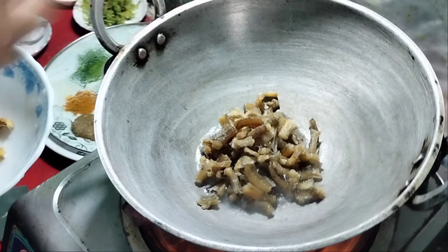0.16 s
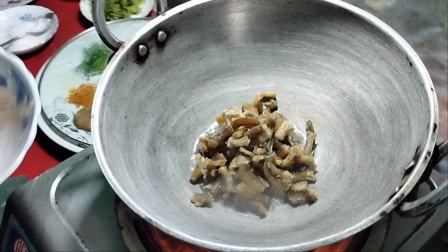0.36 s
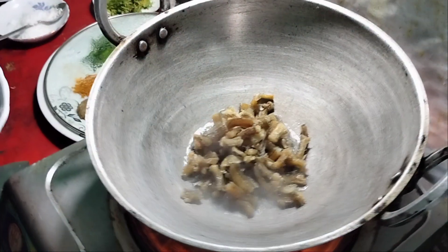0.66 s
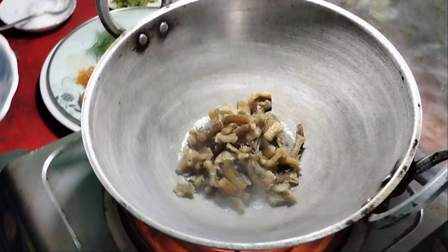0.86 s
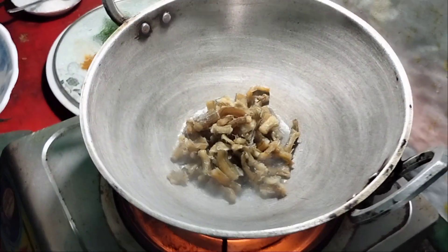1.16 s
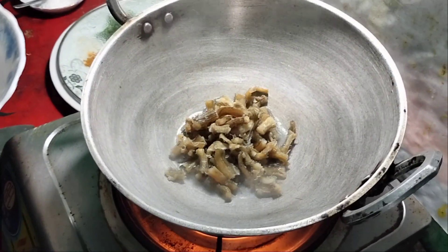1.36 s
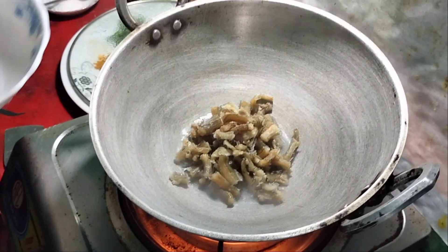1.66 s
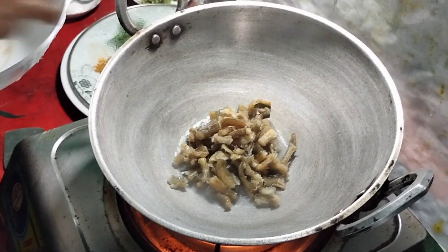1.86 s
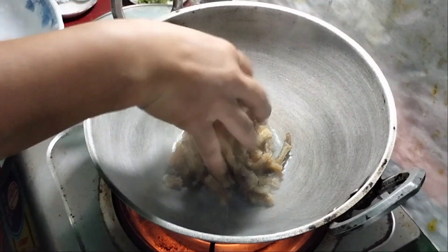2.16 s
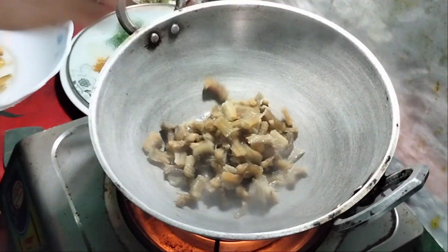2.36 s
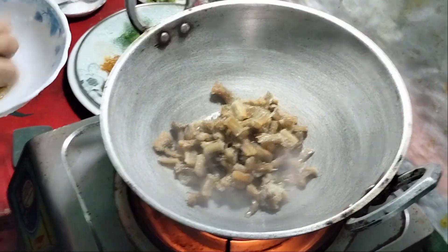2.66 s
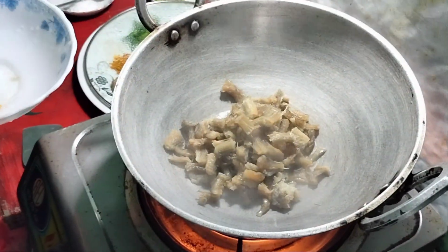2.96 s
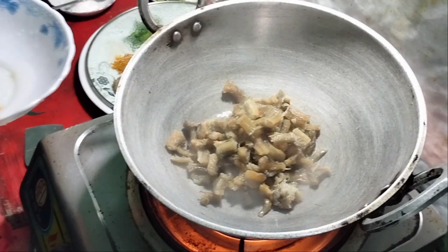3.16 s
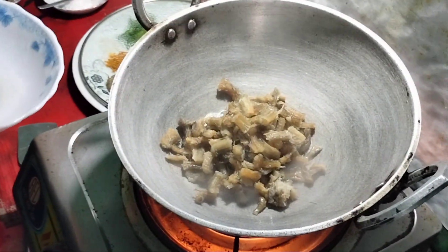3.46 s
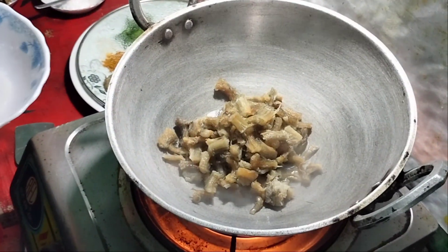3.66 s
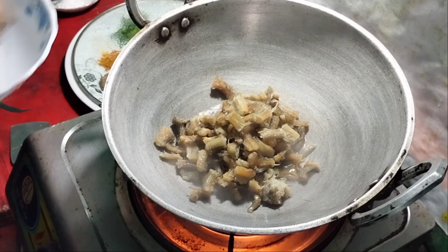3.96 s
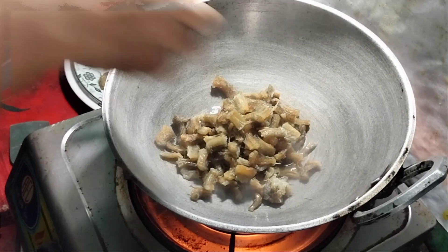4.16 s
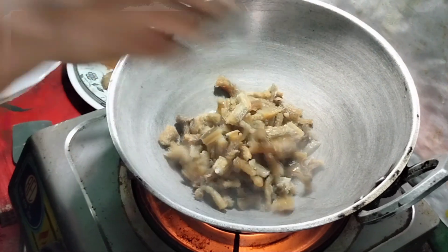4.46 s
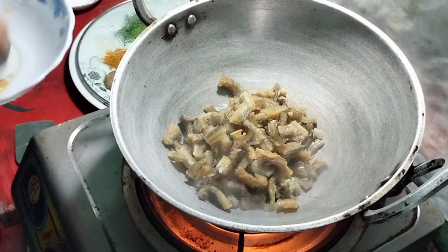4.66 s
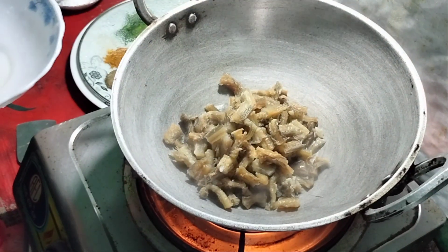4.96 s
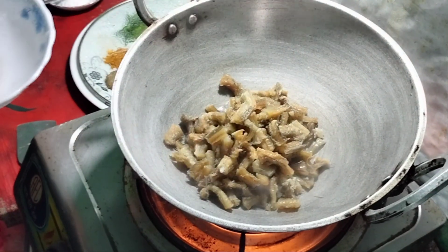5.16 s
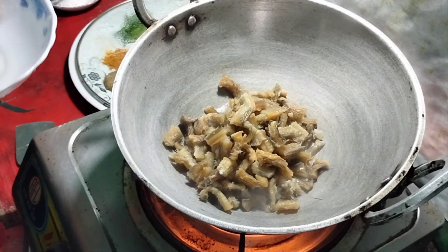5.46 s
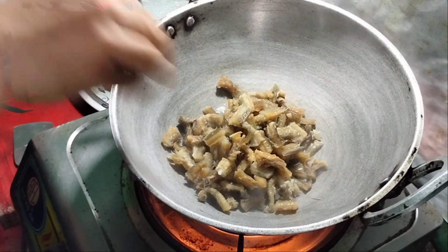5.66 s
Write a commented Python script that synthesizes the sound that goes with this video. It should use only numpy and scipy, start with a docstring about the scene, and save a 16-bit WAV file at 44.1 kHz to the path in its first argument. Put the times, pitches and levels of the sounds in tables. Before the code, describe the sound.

Wet dried fish sizzles loudly and continuously in a metal wok, heard by a close hand-held microphone. The first two thirds of a second carry ticks and soft thuds of handling. Spits crack throughout, thickest early; two light pan taps come near two seconds as fish is dropped in, then the sizzle grows fuller and fizzier. Almost no room is heard.

```python
"""A metal wok with a little hot oil, wet dried fish frying in it, a hand-held microphone close above.
Steam bubbles sizzle throughout: thousands of random damped rings over filtered noise, with sharp spits and
duller pops as filtered impulses. In the first two thirds of a second the microphone's housing is bumped,
heard as contact ticks and damped thuds. Around 2 s fish dropped in by hand taps the pan twice, with a scuff
and a short ring; from 4.4 s on the low simmer under it all fades."""
import sys
import numpy as np
from scipy import signal
from scipy.fft import rfft, irfft, next_fast_len
from scipy.io import wavfile
from scipy.ndimage import map_coordinates

SR = 44100
rng = np.random.default_rng(int(sys.argv[2]) if len(sys.argv) > 2 else 0)


def int16_out(signal):
    """Quantize to a 16-bit WAV file."""
    q = np.round(np.clip(np.atleast_2d(signal).T, -1, 1) * 32767)
    wavfile.write(sys.argv[1], SR, q.astype(np.int16))


N = 255780
TOP_HZ = 15750  # top of the recorder's band, and of the random bubble pitches


def amp(db):
    """Decibels to gain."""
    return 10 ** (np.asarray(db) / 20)


def unit(x):
    """x at rms 1."""
    return x / np.sqrt(np.mean(x ** 2) + 1e-20)


def curves(rows):
    """One value per sample for each column after the time."""
    s, *columns = np.transpose(rows)
    return [np.interp(np.arange(N) / SR, s, column) for column in columns]


def wobble(rate):
    """A smooth random curve, rate knots a second."""
    knots = rng.standard_normal(int(N * rate / SR) + 4)
    return map_coordinates(knots, [np.arange(N) * rate / SR])


def click(spectrum, size=4096):
    """Minimum-phase pulse: the shortest causal pulse with this (f/Hz, level/dB) spectrum, at peak 1."""
    f, db = np.transpose(spectrum)
    hz = np.fft.rfftfreq(size, 1 / SR)
    level_db = np.interp(np.log(hz + 1), np.log(f), db)
    cepstrum = irfft(np.log(amp(level_db)))
    # folding the cepstrum forward in time makes the pulse causal
    cepstrum[1:size // 2] *= 2
    cepstrum[size // 2 + 1:] = 0
    pulse = irfft(np.exp(rfft(cepstrum)))
    return pulse / np.abs(pulse).max()


def through(x, response):
    """x played through an impulse response."""
    return signal.fftconvolve(x, response)[:N]


def blows(rows):
    """One impulse for each (t/s, level/dB) row."""
    s, db = np.transpose(rows)
    return np.bincount(np.round(s * SR).astype(int), amp(db), N)


def scattered(per_second, level_db, spread_db):
    """Impulses at random times, of random size within level_db +- spread_db."""
    when, size = rng.random((int(per_second * N / SR), 2)).T
    size_db = level_db + spread_db * (2 * size - 1)
    return np.bincount((when * N).astype(int), amp(size_db), N)


def modes(table, size):
    """Damped sines struck together, at peak 1."""
    t = np.arange(size) / SR
    ring = sum(amp(db - 60 * t / t60) * np.sin(2 * np.pi * hz * t) for hz, db, t60 in table)
    return ring / np.abs(ring).max()


def bubbles(per_second, spread_db, t60, hz=None, scatter=0, count=180):
    """Bursting bubbles at rms 1: damped rings of random time, size and life, at any pitch or round hz."""
    draws = rng.random((int(per_second * N / SR), 5))
    start, pitch, life, radius, angle = draws.T[:, :, None]
    first = (start * N).astype(int)
    gauss = np.sqrt(-2 * np.log(1 - radius)) * np.cos(2 * np.pi * angle)
    size_db = spread_db * np.minimum(gauss, 2.3)  # a bubble can only grow so big
    if hz is None:
        ring_hz = pitch * TOP_HZ
    else:
        ring_hz = hz[first] * (1 + scatter * (2 * pitch - 1))
    t = np.arange(count) / SR
    decay = amp(-60 * t / (t60 * (.5 + life)))
    rings = amp(size_db) * decay * np.sin(2 * np.pi * ring_hz * t)
    samples = first + np.arange(count)
    return unit(np.bincount(samples.ravel(), rings.ravel(), N)[:N])


def bowl(x, echo_db, t60):
    """The wok's curved wall scatters sound back within milliseconds; every 20 ms gets a new random echo."""
    t = np.arange(SR // 50) / SR
    out = np.zeros(N + SR)
    for i in range(0, N, len(t)):
        echo = rng.standard_normal(len(t)) * amp(-60 * t / t60) * (t > .0003)
        answer = signal.fftconvolve(x[i:i + len(t)], echo / np.linalg.norm(echo))
        out[i:i + len(answer)] += answer
    return x + amp(echo_db) * out[:N]


# modes of the metal wok: f/Hz, relative level/dB, t60/s
WOK_MODES = [(495, -1, 0.37), (760, -5, 0.56), (872, 1.5, 0.34), (1310, -26, 0.23), (1404, 7.5, 0.26),
             (1494, 6, 0.19), (2200, 6.5, 0.17), (2640, 6.5, 0.2)]


def wok_ring():
    """The pan's ring, damped by oil and food."""
    return modes(WOK_MODES, size=SR // 4)


# share of the full-pan sound: t/s, share (0-1)
PAN_FULLNESS = [(0, 1), (1.2, 0), (2.2, 0.3), (2.4, 0.9), (5.8, 1)]


def fullness():
    """How far the sound is that of a full pan, 0 to 1."""
    return np.clip(curves(PAN_FULLNESS)[0], 0, 1)


# course of the coarse bubbling under the fish: t/s, level/dB before its wobble
BUBBLING_LEVEL = [(0, -31.5), (.4, -30.5), (1.5, -31), (2.1, -33.5), (2.6, -29.5), (3.75, -33.5),
                  (4.1, -31), (4.85, -30), (5.3, -33), (5.8, -33)]
# colour of that bubbling: f/Hz, relative level/dB
SPUTTER_COLOUR = [(30, -89), (120, -21), (300, -4), (600, 1), (900, 2), (1400, 6), (1800, 4.5), (2250, 5),
                  (2700, -0.5), (3300, 5.5), (5000, -43)]
# colour of the low simmer: f/Hz, relative level/dB
SIMMER_COLOUR = [(10, -72), (25, -31), (50, -22), (80, -1), (115, 2), (170, 2), (260, 0.5), (400, -0.5),
                 (900, -32), (3000, -73)]
SIMMER_DB, SIMMER_FULL_DB = -20, 3.5  # against the bubbling; its gain in a full pan
FADE_START_S, FADE_DB_PER_S = 4.4, 3.5  # the simmer fades once the last handful is in


def sputter():
    """Coarser, sparser bubbling under the fish keeps the pan faintly ringing, over a low simmer."""
    sputter_db = curves(BUBBLING_LEVEL)[0] + 0.52 * wobble(9)
    fade_db = FADE_DB_PER_S * np.maximum(np.arange(N) / SR - FADE_START_S, 0)
    simmer_db = sputter_db + SIMMER_DB + SIMMER_FULL_DB * fullness() - fade_db

    ticks = bubbles(per_second=650, spread_db=5.5, t60=0.00032)
    fine_ticks = bubbles(per_second=3000, spread_db=5, t60=0.00016)
    bursts = ticks + amp(-3) * fine_ticks + amp(1.0) * rng.standard_normal(N)
    coarse = unit(through(bursts, click(SPUTTER_COLOUR)))
    coarse = coarse + amp(-9) * unit(through(bursts, wok_ring()))

    rumble = rng.standard_normal(N) * amp(2.5 * wobble(40))
    simmer = unit(through(rumble, click(SIMMER_COLOUR)))
    return amp(sputter_db) * coarse + amp(simmer_db) * simmer


# bumps on the microphone's housing: t/s, relative thud level/dB, relative tick level/dB
HOUSING_BUMPS = [(0.109, -11.5, -12), (0.132, -13.5, -8.5), (0.246, -24, -30), (0.269, -11.5, -8.5),
                 (0.398, -18.5, -28), (.466, -4.5, -9), (0.5018, -8.5, -6), (.5672, -25, -19),
                 (0.5892, -5.5, -11.5), (0.628, -16, -19)]
# heavily damped modes of the housing: f/Hz, relative level/dB, t60/s
HOUSING_MODES = [(126, -2, 0.028), (213, 1, 0.025), (302, -6.5, 0.032), (445, -13, 0.051), (614, -16, .03)]
RECOIL_S, RECOIL_DB = .0032, -8  # typical delay of the housing's second touch, and its level


def bumps():
    """Handling of the microphone: a contact tick and its recoil, with a low thud as its housing gives."""
    rows = np.array(HOUSING_BUMPS)
    pushes = blows(rows[:, :2] + [.001, 0])  # the housing gives 1 ms after contact
    thuds = through(pushes, modes(HOUSING_MODES, size=SR // 20))
    bass_cut = signal.butter(2, 85, "highpass", fs=SR, output="sos")
    tick = click([(40, -19), (300, -13), (800, 3.5), (1500, 0.5), (2600, -3.5), (4000, -10.5),
                  (7000, -20), (14000, -38)])
    contacts = rows[:, ::2]
    delay_factors = rng.uniform(0.48, 1.3, len(rows))
    recoils = contacts + np.outer(delay_factors, [RECOIL_S, 0]) + [0, RECOIL_DB]
    ticks = through(blows(contacts) + blows(recoils), tick)
    return amp(0.6) * signal.sosfilt(bass_cut, thuds) + amp(6.5) * ticks


# light taps of fish on the pan: t/s, relative level/dB
PAN_TAPS = [(1.9064, -23.5), (2.2064, -17)]


def taps():
    """A light blow on the pan: a tick, a brief scuff as the piece slides, and a short metallic ring."""
    hits = blows(PAN_TAPS)
    tick = click([(60, -42), (300, -9), (650, 5.5), (1300, 5), (2200, -2.0), (3000, -16), (8000, -25)])
    t = np.arange(SR // 10) / SR
    slide = amp(-60 * t / .085)
    scuff = through(hits, rng.standard_normal(len(t)) * slide)
    contact = through(amp(4.0) * hits + amp(-13.0) * scuff, tick)
    return contact + amp(-1) * through(hits, wok_ring())


# larger steam pockets opening: t/s, relative snap level/dB, relative low push level/dB
STEAM_POPS = [(0.1958, -16, -26), (0.3753, -12, -37), (0.868, -12, -23), (0.9887, -12.5, -43),
              (1.2753, -10, -25), (2.5483, -11, -24.5), (2.5647, -16, -24), (2.585, -20, -29),
              (3.0039, -9, -17.5), (3.0778, -12.5, -31), (3.1588, -7.5, -20), (3.6514, -16.5, -25),
              (3.704, -13, -37), (4.115, -9.5, -21.5), (4.2794, -24, -26), (5.4815, -21, -33)]
# colour of the dry snap: f/Hz, relative level/dB
SNAP_COLOUR = [(20, -34), (100, 0.5), (400, 4), (900, 12.5), (1500, 10), (2500, 10), (5000, -26),
               (12000, -50)]
SMALL_POPS_PER_S, SMALL_POP_DB, SMALL_POP_SPREAD_DB = 4, -20.5, 2.5
SMALL_PUSH_DB = -14.5  # push impulse against the snap impulse of a small pop


def pops():
    """Steam pockets open with a dry snap and a low push that barely ring the pan."""
    rows = np.array(STEAM_POPS)
    small = scattered(SMALL_POPS_PER_S, SMALL_POP_DB, SMALL_POP_SPREAD_DB)
    snaps = blows(rows[:, :2]) + small
    pushes = blows(rows[:, ::2] + [.001, 0]) + amp(SMALL_PUSH_DB) * small  # listed pushes lag by 1 ms
    snap = bowl(through(snaps, click(SNAP_COLOUR)), echo_db=-9, t60=.014)
    push = click([(20, -20), (70, -5), (150, 2.5), (330, 4.0), (600, -13), (2000, -33)])
    ring = through(snaps, wok_ring())
    return amp(2.5) * snap + amp(-1.0) * through(pushes, push) + amp(-41) * ring


# loudest water drops bursting in the oil: t/s, relative level/dB
WATER_SPITS = [(.2453, 2), (.3738, 0), (.5908, 3.5), (.7167, 1), (.8076, 3.5), (.9019, -3), (.9748, -0.5),
               (1.1654, 1.5), (1.2071, 0), (1.6653, -4), (1.8921, 7), (2.0605, -2), (2.5145, 3),
               (3.4331, 4), (5.254, 2), (5.7515, 2)]
SMALL_SPITS_PER_S, SMALL_SPIT_DB, SMALL_SPIT_SPREAD_DB = 7, -4.5, 2


def spits():
    """A water drop explodes: one sharp crack with the sizzle's colour and a quick echo off the pan."""
    drops = blows(WATER_SPITS) + scattered(SMALL_SPITS_PER_S, SMALL_SPIT_DB, SMALL_SPIT_SPREAD_DB)
    cracks = through(drops, click(SIZZLE_COLOUR) + amp(-3) * click(FIZZ_COLOUR))
    return amp(-2) * bowl(cracks, echo_db=0, t60=.006)


# slow course of the boil: t/s, relative level/dB
BOIL_LEVEL = [(0, -16), (0.3, -18.5), (0.45, -17), (0.95, -17.5), (1.33, -16), (1.45, -13.5), (1.75, -15.5),
              (2.2, -15), (2.8, -14.5), (3.0, -15.5), (3.35, -14.5), (3.75, -15.5), (4.9, -14),
              (5.5, -15.5), (5.8, -16)]
# moisture meets the oil and the sizzle flares up: t/s, rise/dB
MOISTURE_FLARES = [(.245, 3), (.425, 4), (.705, 6), (.78, 3), (1.08, 3), (1.265, 2), (2.385, 2.5),
                   (2.51, 2.5), (3.205, 1.5), (5.25, 1), (5.745, 1.5)]
FLARE_ATTACK_S, FLARE_DECAY_S = 0.01, 0.026  # time constants
# the sizzle dips briefly: start t/s, end t/s, depth level/dB
SIZZLE_LULLS = [(0.488, 0.678, 3.5), (1.81, 1.88, 5), (2.08, 2.135, 2), (2.218, 2.296, 3.5),
                (3.424, 3.53, 3)]
LULL_EDGE_S = .02


def boil():
    """Course of the sizzle in dB: a slow curve, flares that rise fast and settle, and brief lulls."""
    t = np.arange(N) / SR
    level_db, = curves(BOIL_LEVEL)
    for s, rise_db in MOISTURE_FLARES:
        distance = np.maximum((s - t) / FLARE_ATTACK_S, (t - s) / FLARE_DECAY_S)
        level_db = level_db + rise_db * np.exp(-distance)
    for start, end, depth_db in SIZZLE_LULLS:
        inside = np.minimum(t - start, end - t) / LULL_EDGE_S
        level_db = level_db - depth_db * np.clip(.5 + inside, 0, 1)
    return level_db


# colour of the sizzle in a full pan: f/Hz, relative level/dB
SIZZLE_COLOUR = [(100, -101), (900, -37), (2000, -15), (2800, -10), (3300, -4.5), (3700, -1), (4250, -.5),
                 (4800, -2.5), (5700, -6.5), (6800, -3.5), (8000, -5), (9200, -10.5), (10500, -32),
                 (13000, -34)]
# colour of the sizzle with only a few pieces in the oil: f/Hz, relative level/dB
FEW_PIECES_COLOUR = [(100, -85), (900, -37), (1500, -17.5), (2200, -11), (2800, -9), (3300, -5.5),
                     (3750, -2), (4300, -2.5), (4800, -1.5), (5600, -5.5), (7000, -3.5), (8000, -9.5),
                     (9200, -12.5), (10500, -25), (13000, -40.5)]
# colour of the fine spray: f/Hz, relative level/dB
FIZZ_COLOUR = [(100, -100), (5000, -24), (8000, -1), (9500, -7.5), (10900, -9), (12000, -4.5), (13000, 1),
               (14200, 1.5), (15700, 0)]
# the bubbles that ring longest: t/s, centre f/Hz, relative level/dB
BUBBLE_RINGS = [(0, 4220, -2.5), (.45, 4250, -2), (.8, 4320, -6.5), (1.6, 3920, -2.5), (2.6, 4100, -7.5),
                (5.8, 3920, -7.5)]
FIZZ_DB, FIZZ_FULL_DB = -5, 2.5  # fine spray against the boil's course; its gain in a full pan


def sizzle():
    """Dense bubble bursts in little flurries over a hiss of steam; the smallest fizz, more in a full pan."""
    full = fullness()
    boil_db = boil() + 0.47 * wobble(18)
    fizz_db = boil_db + FIZZ_DB + FIZZ_FULL_DB * full + .5 * wobble(11)
    pitch_hz, ring_db = curves(BUBBLE_RINGS)
    flurry = wobble(110)

    crackle = bubbles(per_second=5000, spread_db=4.0, t60=0.00078)
    crackle = unit(bowl(crackle, echo_db=-5, t60=0.01))
    bursts = crackle + amp(-1.0) * rng.standard_normal(N)
    few_pieces = through(bursts, click(FEW_PIECES_COLOUR))
    full_pan = through(bursts, click(SIZZLE_COLOUR))
    body = unit((1 - full) * few_pieces + full * full_pan)

    ringing = bubbles(per_second=900, spread_db=7.5, t60=0.0062, hz=pitch_hz, scatter=0.063, count=400)
    ringing = unit(through(ringing, click(SIZZLE_COLOUR)))

    mist = bubbles(per_second=1800, spread_db=3.5, t60=0.0017)
    hiss = amp(4.5) * rng.standard_normal(N)
    spray = unit(through(crackle + amp(1.0) * mist + hiss, click(FIZZ_COLOUR)))

    sizzling = amp(boil_db - 1.36 + 0.54 * flurry) * (body + amp(ring_db - 2.0) * ringing)
    return sizzling + amp(fizz_db + 0.51 * flurry) * spray


def scene():
    """Everything at one close microphone."""
    return (sputter() + bumps() + taps() + pops() + spits() + sizzle())[None]


def record(dry):
    """The recorder rounds off the highest peaks and keeps only its band, without the deepest bass."""
    held = dry / (1 + np.abs(dry) ** 12) ** (1 / 12)
    size = next_fast_len(N + SR // 2)
    hz = np.fft.rfftfreq(size, 1 / SR)
    bass_cut = (1j * hz / (1j * hz + 38)) ** 2  # two gentle high-passes at 38 Hz
    return irfft(rfft(held, size) * bass_cut * (hz < TOP_HZ), size)[:, :N]


dry = scene()
out = record(dry)
int16_out(out)
```